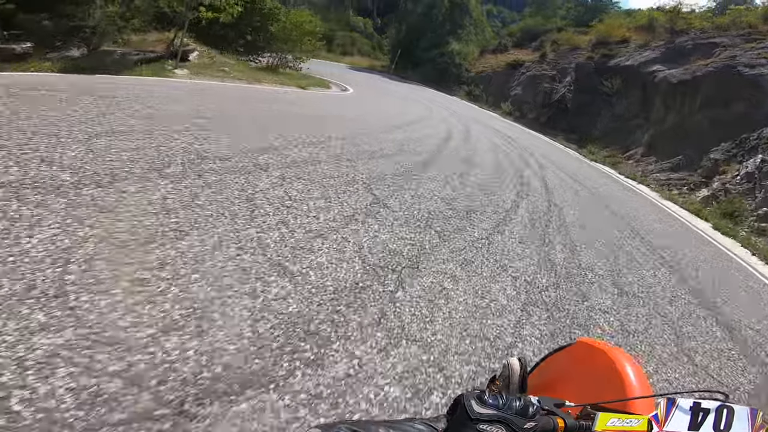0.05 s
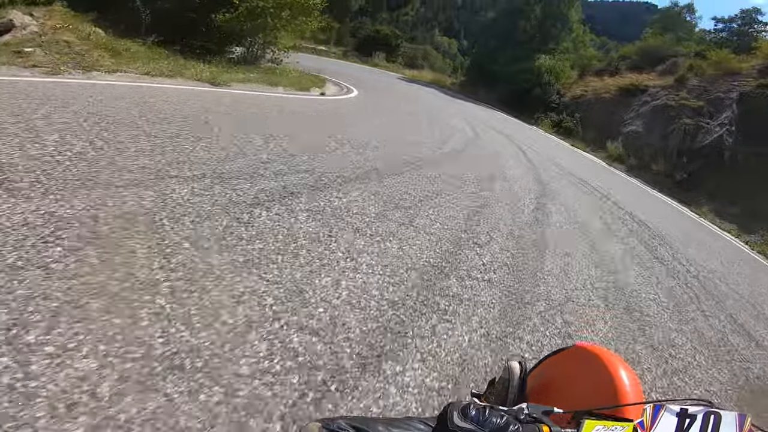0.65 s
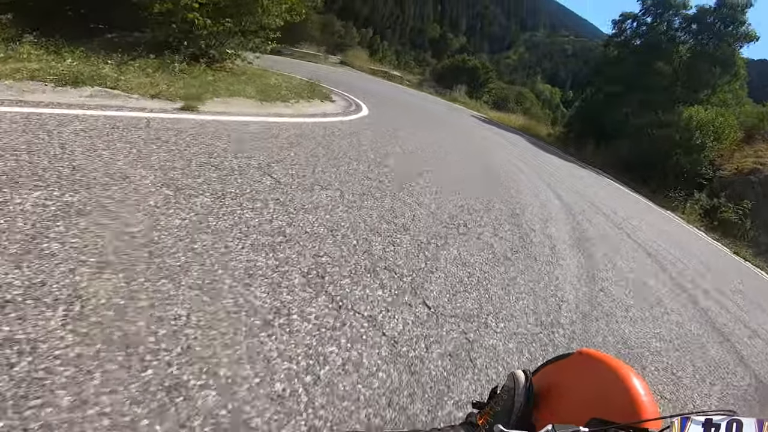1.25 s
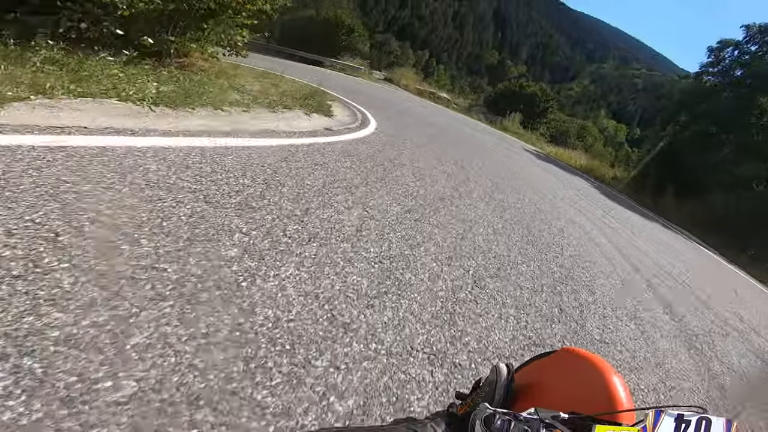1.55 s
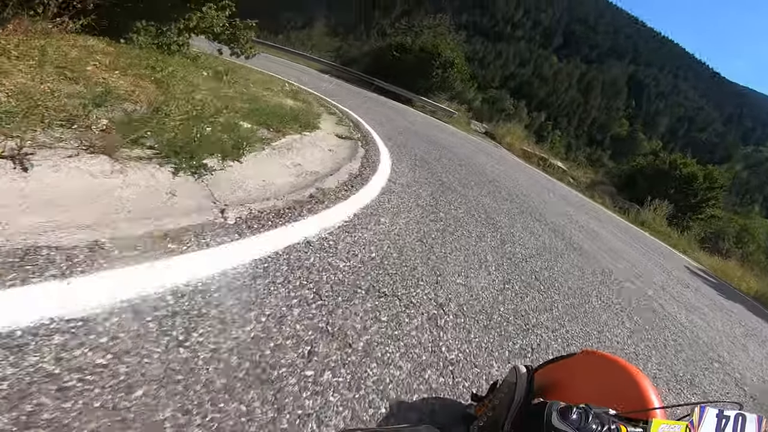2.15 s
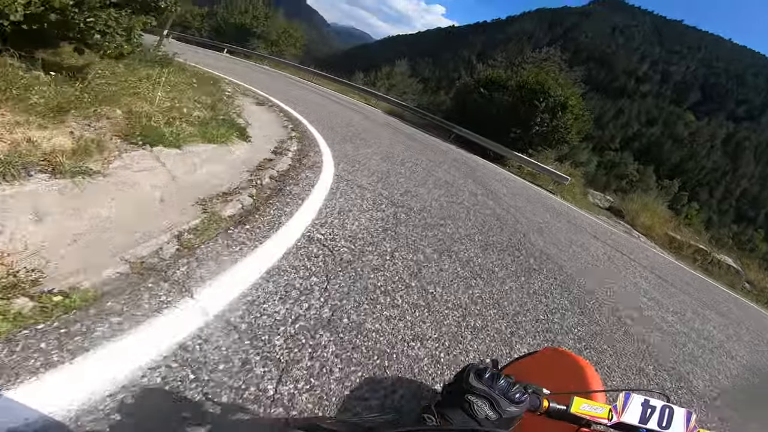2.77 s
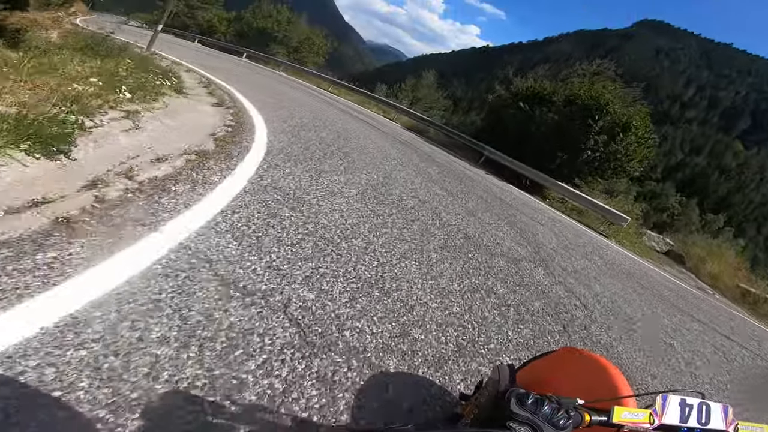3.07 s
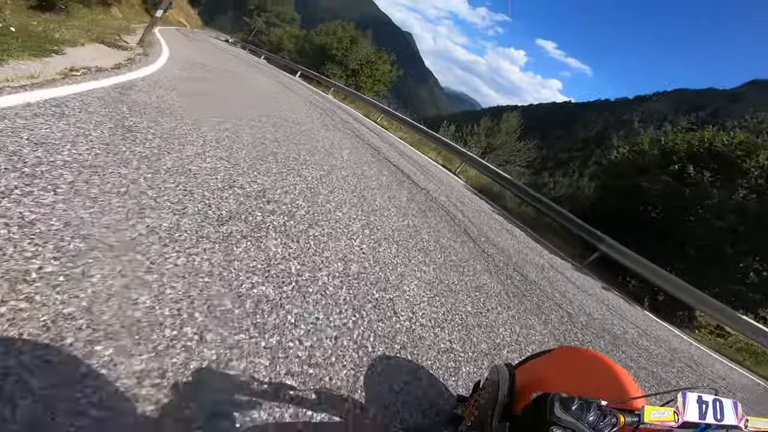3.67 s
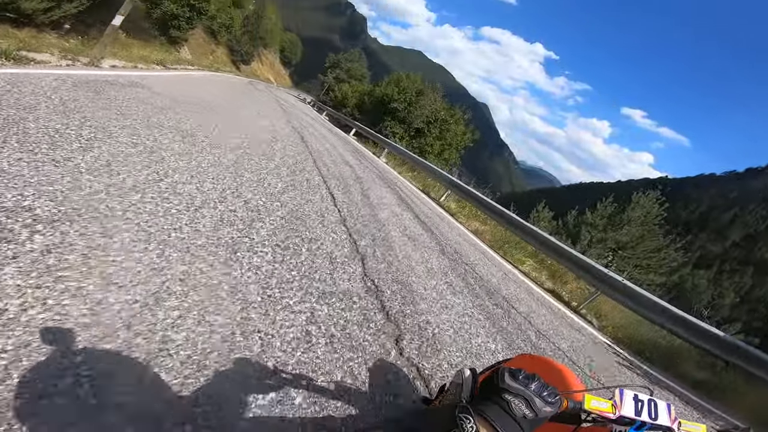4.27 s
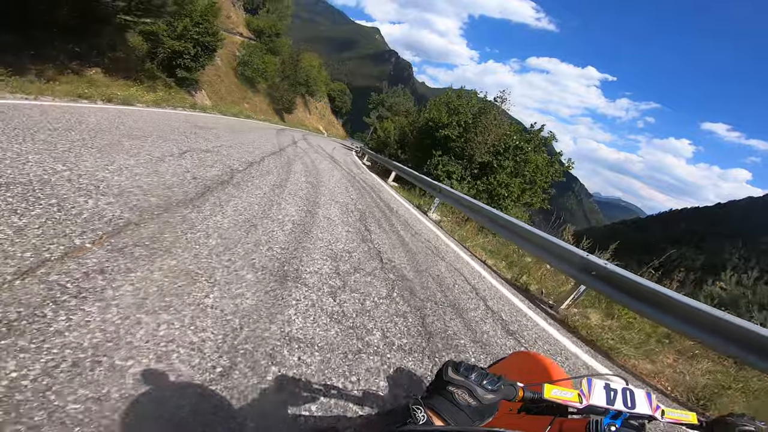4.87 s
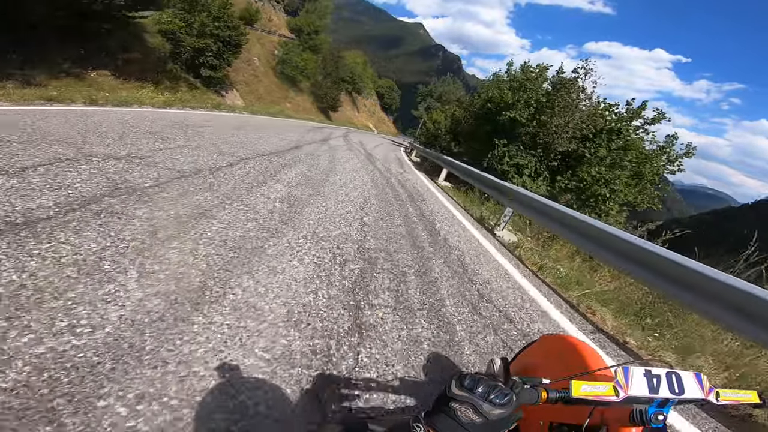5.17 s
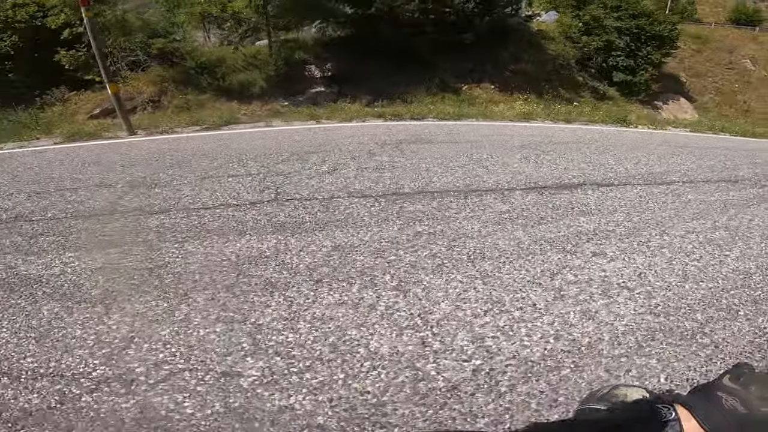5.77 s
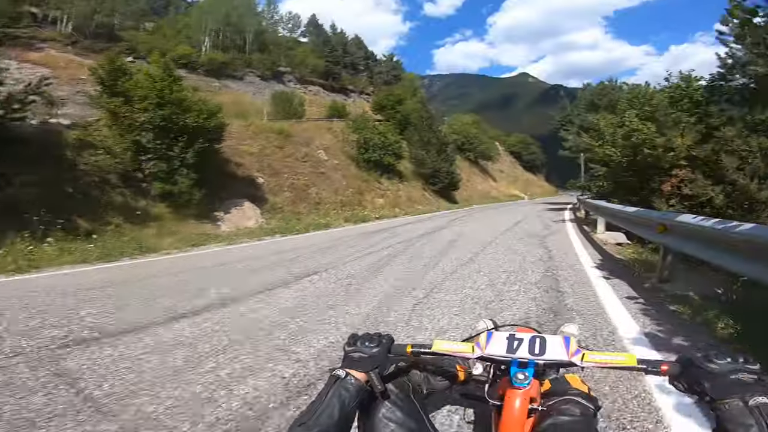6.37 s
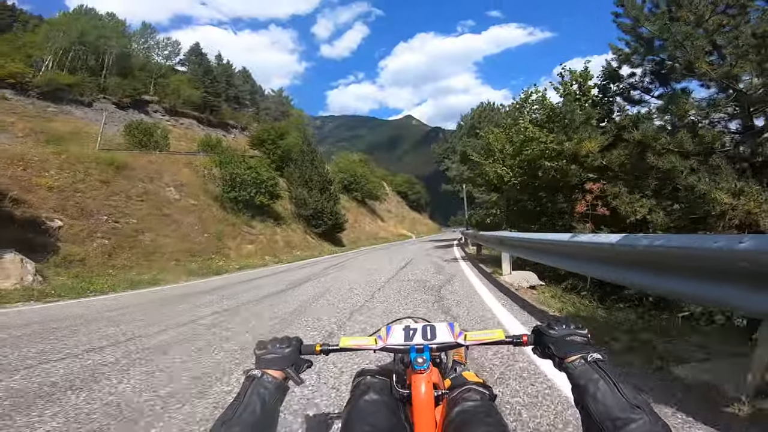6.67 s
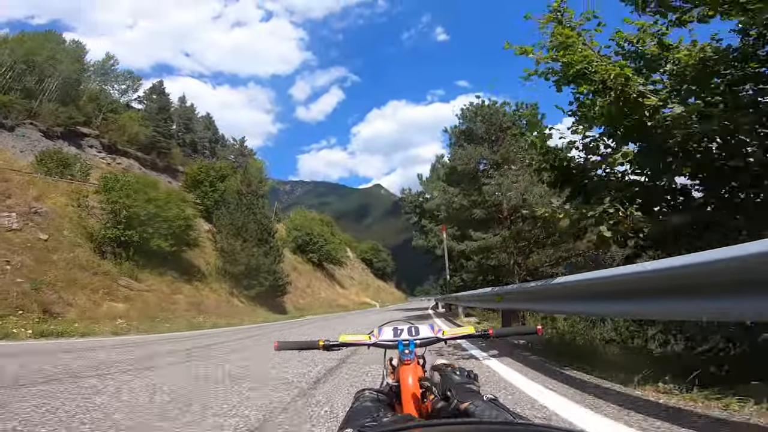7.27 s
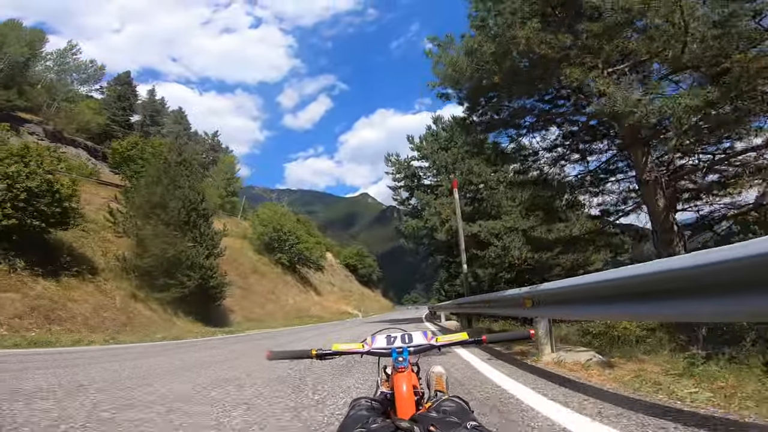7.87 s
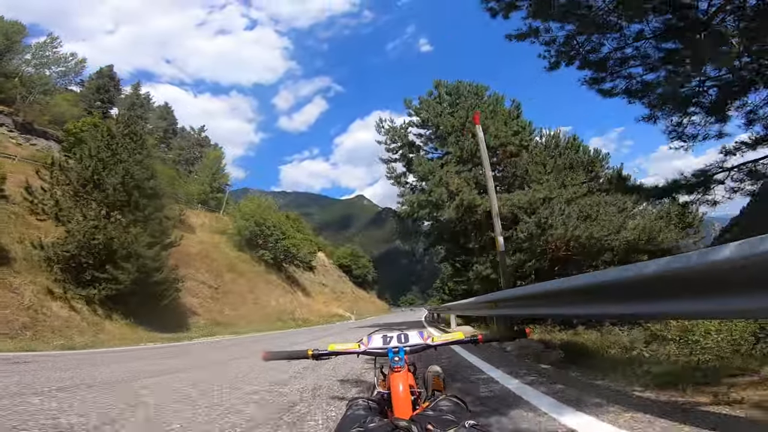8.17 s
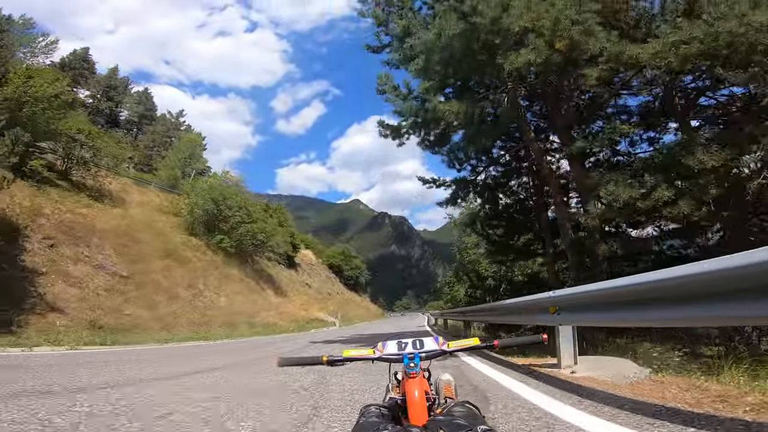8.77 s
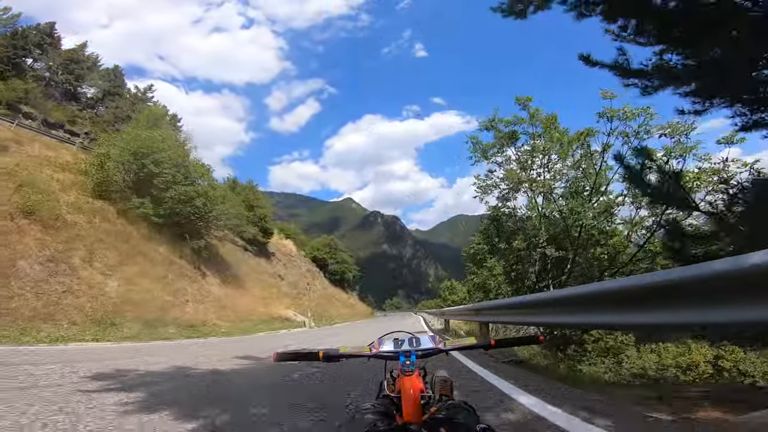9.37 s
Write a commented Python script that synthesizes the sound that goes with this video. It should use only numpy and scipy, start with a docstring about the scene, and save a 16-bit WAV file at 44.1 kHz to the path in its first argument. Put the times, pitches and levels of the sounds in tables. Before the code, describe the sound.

Plastic wheels groan and rasp sideways over coarse asphalt, giving way to rushing wind, short rumbles and a few frame knocks.

```python
"""A hollow drone and a gritty scrub: a drift trike slides through a mountain bend on coarse asphalt.
The road drives the resonances of its hollow plastic wheels, which groan by stick-slip friction and
flick stones against the frame. The trike straightens and gathers speed; the frame knocks as the rider
shifts and shudders over uneven road. Turbulent wind buffets and rushes over the rider's microphone
and sings near the end; a limiter holds the peaks."""
import sys
import numpy as np
from scipy import signal
from scipy.fft import rfft, irfft, next_fast_len
from scipy.io import wavfile
from scipy.ndimage import uniform_filter1d, minimum_filter1d, map_coordinates

SR = 44100
rng = np.random.default_rng(int(sys.argv[2]) if len(sys.argv) > 2 else 0)


def transcribe(u):
    """Save the signal u as a 16-bit wav file named by the first command-line argument.

    u: samples, shape (n,) or (channels, n), limited to [-1, 1]; the rate is SR.
    q: integer samples, one column per channel.
    """
    v = np.clip(np.atleast_2d(u).T, -1, 1)
    q = np.round(v * 32767).astype(np.int16)
    wavfile.write(sys.argv[1], SR, q)


N = 424683
VIBRATION_HOLD = 0.61  # how far a driven vibration is evened out, 0-1

# sideways slip of the rear wheels: t/s, share of sliding, share of hard skid
WHEEL_SLIP = [(0, 0.68, 0.95), (1.15, 0.64, 0.73), (1.55, 0.93, 0.42), (2.4, 0.98, 0.01), (5.2, 0.94, .02),
              (5.56, 0.8, 0.28), (5.65, 0.15, 0.27), (6.48, 0.03, 0.39), (6.75, 0.23, 0.04)]
# spectrum of plastic carving over stone: f/Hz, level/dB
CARVE_SPECTRUM = [(300, -24.5), (700, -3.5), (1000, -0.2), (1250, -3.5), (1450, -2.5), (2100, -3),
                  (2650, -10), (3000, -11.5), (4500, -29), (6500, -33), (12000, -72.5)]


def wheel_drone(road, bite_db, straight):
    """Forced resonance: the road drives the hollow wheels; sliding favours their lower modes."""
    # wall and cavity modes: f/Hz, width/Hz, sliding level/dB, rolling level/dB
    modes = [(143, 45, -20, -22), (193.7, 40, -15.5, -15), (266.9, 31.6, 2, -14.5),
             (299.1, 47.3, -0.2, -4.5), (355, 50, -4.5, -5), (414, 39, -3.6, -8), (448.6, 41, -7.8, -9),
             (492.4, 73, -22, -8), (578, 75, -14, -16), (670, 79, -18.5, -20.5), (789, 44, -18, -31),
             (901, 146, -29.5, -28)]
    # surges and sags as weight shifts on the wheels: centre t/s, duration/s, gain/dB
    loads = [(.42, .2, 2), (1.05, 0.26, -0.5), (1.68, .3, 0), (2.25, .2, 1), (2.68, .16, -4.5),
             (2.93, .16, 2), (3.68, 0.13, -2), (3.88, 0.16, -1), (4.53, 0.15, 1.5), (5.22, 0.16, 0.5),
             (5.52, 0.29, 4), (6.34, .12, -1), (6.84, 0.092, -2)]
    sliding, skid = curves(WHEEL_SLIP)
    rings = np.array([resonance(hz, width) for hz, width, _, _ in modes])
    mode_hz, _, slide_db, roll_db = np.transpose(modes)

    def mix(vibrations):
        roll, slide = (amp(db) @ vibrations / np.std(amp(db) @ rings) for db in (roll_db, slide_db))
        return blend(roll, slide, sliding)

    bite_gain = amp(1.7 * np.outer(mode_hz / 1000, bite_db))  # higher modes answer most to a hard bite
    drone = mix(rings * bite_gain) * steadying(mix(rings), VIBRATION_HOLD)
    level_db = -20.5 + 8 * sliding - 0.34 * skid - 13 * straight
    return amp(level_db + swells(loads) + .35 * road) * drone


def gliding_tones():
    """Narrow-band noise: the wheels groan, and near the end the wind sings higher as speed grows."""
    # gliding bands of tone, the last one wind: start t/s, end t/s, start f/Hz, end f/Hz, width/Hz, level/dB
    bands = [(0, 1.249, 560, 589, 170, -28), (.75, 1.202, 758, 654, 300, -26.5),
             (1.1, 2.2, 460.8, 369.8, 124, -19.5), (1, 1.35, 1595, 1566, 300, -32),
             (.9, 1.8, 2260, 2330, 170, -38.5), (.3, 1.4, 3120, 3030, 240, -42),
             (6.38, 6.76, 3600, 3600, 2200, -46.5), (2.799, 3.901, 600, 580, 130, -29.5),
             (3.5, 4.898, 785, 804, 130, -32), (3, 5.601, 2030, 2160, 380, -41),
             (2.88, 3.15, 640, 620, 170, -31), (5.6, 6.301, 325.6, 345.2, 66, -25),
             (4.4, 5.65, 420, 445, 69, -28), (5.7, 7.02, 428, 423, 43, -23.5),
             (6.85, 7.45, 520, 560, 160, -25.5), (7.5, 9.9, 1430, 1520, 390, -32),
             (8.5, 9.9, 730, 870, 280, -30)]
    track = np.zeros(N)
    for start, end, from_hz, to_hz, width_hz, db in bands:
        progress = np.linspace(0, 1, round((end - start) * SR))
        flutter = filtered(noise(), lambda f: 1 / (1 + (2 * f / width_hz) ** 4))
        baseband = flutter[:len(progress)] + 1j * flutter[-len(progress):]
        phase = 2 * np.pi * np.cumsum(from_hz + (to_hz - from_hz) * progress) / SR
        band = (baseband * np.exp(1j * phase)).real
        envelope = np.abs(np.sin(np.pi * progress)) ** 0.55
        add(track, start, amp(db) * unit(band * steadying(band, VIBRATION_HOLD)) * envelope)
    return track


def scrub(road, bite_db, straight):
    """Sliding friction: plastic tears over the stone tips, louder and brighter in a hard skid."""
    # spectrum of a hard skid: f/Hz, level/dB
    skid_spectrum = [(300, -19.5), (600, 5.5), (1100, -3), (1600, -3), (2300, -1), (3100, -6.5),
                     (4200, -15.5), (5500, -27.5), (8000, -42), (12000, -76.5)]
    sliding, skid = curves(WHEEL_SLIP)
    level_db = -34.5 + 4 * sliding + 7.5 * skid + straight
    contact = lambda: patchy(blend(noise(), impacts(per_s=1800, spread_db=4), 0.56), depth_db=1.24)
    rub = blend(coloured(contact(), CARVE_SPECTRUM), coloured(contact(), skid_spectrum), skid)
    return amp(level_db + bite_db + 1.7 * road * (1 - .5 * skid)) * rub


def wind(straight):
    """Turbulence: eddies buffet the microphone; at speed, vortex shedding throbs and the air rushes."""
    # buffeting, weakest in the slow middle of the bend: t/s, level/dB
    airflow = [(0, -17.5), (.45, -24.5), (1.25, -25.5), (1.7, -35.5), (2.6, -41), (3, -35.5), (4.55, -31),
               (6.3, -24.5), (7.05, -15), (9.63, -15.5)]
    # gusts and lulls: centre t/s, duration/s, gain/dB
    gusts = [(.29, 0.17, 5.5), (2.04, 0.26, 11.5), (3.72, .2, 5), (4.28, .2, 4), (4.88, 0.83, 6.5),
             (5.45, .3, 5), (5.64, 0.21, -8), (6.1, .14, 5), (6.52, 0.29, 5.5), (6.8, 0.32, -3)]
    # spectra of the eddies and of the airstream: f/Hz, level/dB
    eddy_spectrum = [(10, -14.5), (25, -5.5), (55, 0), (90, -2.5), (125, -3.5), (165, -10), (250, -15),
                     (400, -25.5), (800, -38.5), (2000, -86)]
    rush_spectrum = [(120, -12), (200, -6), (265, 8.5), (335, 7), (440, -12.5), (530, 8), (730, 5),
                     (840, 3), (1150, -1.5), (1370, 2.5), (1720, 2), (1950, -1.5), (2450, -8),
                     (2800, -14.5), (3300, -14), (4100, -22), (6000, -34), (6600, -26.5), (7500, -50.5),
                     (12000, -86)]
    airflow_db, = curves(airflow)
    gust_db = swells(gusts)
    eddies = unit(filtered(coloured(noise(), eddy_spectrum), lambda hz: 1 / (1 + (hz / 2000) ** 4)))
    throb = unit(resonance(centre_hz=97, width_hz=88))
    eddies = blend(eddies, throb, .35 * straight ** 2)
    eddies = unit(eddies * steadying(eddies, hold=.3))
    buffet = amp(airflow_db + gust_db + wobble(14)) * eddies
    rush_db = -24.5 + speed_gain_db(db_per_s=1.7) + 0.6 * gust_db
    flutter = unit(amp(1.7 * eddies + 1.5 * wobble(170) + 0.41 * wobble(25)))
    rush = coloured(patchy(noise(), depth_db=1.03), rush_spectrum)
    return buffet + straight * amp(rush_db) * flutter * rush


def knocks():
    """Damped free vibration: the frame thumps and rebounds as the rider shifts."""
    # blows to the frame: t/s, level/dB
    blows = [(6.734, -3), (6.76, -9.5), (6.79, -7.5), (6.811, -11.5), (8.626, -7.5)]
    # frame modes: f/Hz, relative level/dB, T60/s
    modes = [(69, -3, 0.13), (121, -5, 0.09), (213, -1, 0.07), (385, -4.5, 0.055), (548, -2.5, 0.045),
             (917, -7.5, 0.024)]
    track, t = np.zeros(N), np.arange(SR // 4) / SR
    for s, db in blows:
        thump = np.zeros(len(t))
        for hz, mode_db, t60 in modes:
            decay = amp(mode_db + rng.normal(0, 1.7) - 60 * t / t60)
            thump += decay * np.sin(2 * np.pi * (hz * t + rng.random()))
        add(track, s, amp(db) * thump * attack(t, rise_s=0.0013))
    return track


def shudders():
    """Forced vibration: uneven road shakes the frame into short rumbles."""
    # shakes: centre t/s, duration/s, level/dB
    shakes = [(6.55, 0.15, -17), (6.757, 0.095, -17), (7.065, .18, -16.5), (7.678, 0.17, -19.5),
              (7.78, 0.1, -18.5), (8.093, .12, -18.5), (8.288, .2, -18.5), (8.637, .09, -19),
              (9.353, 0.11, -17.5)]
    # spectrum of the shaken frame: f/Hz, level/dB
    spectrum = [(50, -6), (130, 1), (220, 1), (330, -1), (450, -10), (700, -11.5), (1050, -18.5),
                (1500, -41), (4000, -77.5)]
    envelope = swells([(s, length, amp(db)) for s, length, db in shakes])
    rumble = coloured(noise(), spectrum)
    return envelope * unit(rumble * steadying(rumble, VIBRATION_HOLD))


def bumps():
    """Impact noise: the plastic wheels slap over coarse spots in the asphalt."""
    # slaps: t/s, level/dB
    slaps = [(1.039, -23), (2.812, -25), (3.283, -22), (3.823, -26), (4.551, -23), (4.58, -27),
             (6.054, -20), (8.674, -14), (8.854, -17)]
    track, t = np.zeros(N), np.arange(SR // 10) / SR
    t60 = 0.019
    for s, db in slaps:
        add(track, s, amp(db - 60 * t / t60) * attack(t, rise_s=0.00092))
    return track * coloured(noise(), CARVE_SPECTRUM)


def stones():
    """Impact transients: each stone cracks brightly, then rattles as it breaks or skips away."""
    # stones crunched and flicked against the frame: t/s, level/dB, rise/s, rattle T60/s
    hits = [(.586, -35.5, .0007, .03), (3.385, -34, .002, .05), (3.617, -36, 0.0011, .04),
            (4.579, -34, .001, .05), (4.61, -29, .01, 0.23), (4.925, -37, 0.0069, .12),
            (5.692, -31, .0005, 0.035), (5.946, -40, 0.00056, .03), (6.054, -23, 0.00069, 0.13),
            (6.374, -32.5, .001, .05), (7.583, -32, 0.0006, 0.037), (7.947, -35, 0.00091, 0.045),
            (8.71, -30.5, 0.001, 0.054), (8.855, -28.5, 0.00075, .04)]
    # spectra of the first crack and of stone clacking on metal: f/Hz, level/dB
    crack_spectrum = [(1500, -10), (4500, 1), (6200, 8.5), (7500, -1), (9800, -6), (11000, -17.5),
                      (12000, -29), (15000, -27)]
    clack_spectrum = [(500, -14.5), (1500, 6.5), (3000, 9), (4600, 0), (5400, 2), (6300, 4), (7300, -7.5),
                      (8600, -12), (9500, -13), (10400, -21), (12000, -38), (15000, -41)]
    crack_db, crack_t60, rattle_db = -2.5, 0.011, -6
    cracks, rattles, t = np.zeros(N), np.zeros(N), np.arange(SR // 3) / SR
    for s, db, rise_s, t60 in hits:
        onset = amp(db) * attack(t, rise_s)
        add(cracks, s, onset * amp(crack_db - 60 * t / crack_t60))
        add(rattles, s, onset * amp(rattle_db - 60 * t / t60))
    cracks *= coloured(noise(), crack_spectrum)
    rattles *= amp(2 * wobble(300)) * coloured(noise(), clack_spectrum)
    return cracks + rattles


def grit(road, bite_db, straight):
    """Shot noise: loose grains crackle in clumps where the road is rough."""
    # spectrum of the grains: f/Hz, level/dB
    spectrum = [(1000, -24.5), (2200, 1.5), (4000, 8.5), (5500, 1), (6300, -5.5), (7200, -7), (8600, -10),
                (9300, -18), (10200, -18), (11500, -32), (15000, -51.5)]
    sliding, skid = curves(WHEEL_SLIP)
    level_db = -50 + 0.3 * sliding + 6 * skid - 6 * straight + speed_gain_db(db_per_s=1.5)
    clumps_db = (1.66 + 0.8 * (sliding - skid)) * road
    grains = patchy(blend(noise(), impacts(per_s=730, spread_db=3), 0.5), depth_db=1.5)
    return amp(level_db + 1.1 * bite_db + clumps_db) * coloured(grains, spectrum)


def dust_sizzle(road, bite_db):
    """Micro-impacts: the finest dust sizzles under the wheels, most at the end of the slide."""
    # course of the sizzle: t/s, level/dB
    levels = [(2.4, -95), (2.9, -80), (3.3, -85), (4.4, -79), (5.5, -77), (5.65, -98)]
    # spectrum of the dust: f/Hz, level/dB
    spectrum = [(7000, -25), (10500, -2.5), (12000, -1), (15500, -7)]
    level_db, = curves(levels)
    dust = blend(noise(), impacts(per_s=400, spread_db=5.5), .7)
    return amp(level_db + bite_db + 2.5 * road) * coloured(dust, spectrum)


def wheel_bite():
    """Friction varies with contact: a gain in dB that follows grip and jumps on rough asphalt."""
    # the wheels bite harder or go light: centre t/s, duration/s, gain/dB
    bites = [(.05, 0.4, 2), (2.64, 0.19, -1.5), (2.98, 0.52, 1.3), (4.29, 0.23, 0.3), (4.745, .1, -3),
             (5.02, 0.19, -1.5), (5.5, 0.41, -1.9), (5.95, 0.53, -1.6), (6.49, 0.16, 2), (6.8, 0.23, -3),
             (7.25, .5, 2.5)]
    # scrapes across rough patches: start t/s, duration/s, gain/dB
    patches = [(1.079, 0.027, 2), (1.132, 0.044, 2.5), (1.383, .03, 1.5), (1.656, .04, 1.5),
               (2.243, 0.056, 1.5), (2.355, .03, 3.5), (2.93, 0.051, -0.5), (3.05, 0.022, 4),
               (3.392, .042, 1), (3.608, 0.023, 5.5), (4.001, 0.032, 3), (4.247, .027, 4.5),
               (4.291, 0.031, 4.5), (4.342, 0.033, 2.5), (4.44, 0.06, 2), (4.541, 0.061, 3.5),
               (4.61, 0.11, 3), (4.925, 0.043, 3.5), (5.087, 0.045, 2)]
    edge_s, corners = 0.0088, []
    for s, length, db in patches:
        corners += [(s, 0), (s + edge_s, db), (s + length - edge_s, db), (s + length, 0)]
    return swells(bites) + curves(sorted(corners))[0]


def resonance(centre_hz, width_hz):
    """Noise rings through two equal resonators in series, drifting in pitch and strength."""
    peak = lambda f: 1j * f * width_hz / (centre_hz ** 2 - f * f + 1j * f * width_hz)
    clock = np.cumsum(1 + .007 * wobble(3))  # changing load bends the pitch
    ring = filtered(noise(), lambda f: peak(f) ** 2)
    return map_coordinates(ring, [clock], order=1, mode="mirror") * amp(0.49 * wobble(5))


def steadying(x, hold):
    """Self-limiting gain: a driven vibration is fed when weak and checked when strong."""
    power = np.abs(uniform_filter1d(unit(x) ** 2, size=2600)) + .01
    return power ** (-hold / 2)


def speed_gain_db(db_per_s):
    """Level growth once the trike gathers speed, from 6.4 s on."""
    return db_per_s * np.maximum(0, np.arange(N) / SR - 6.4)


def impacts(per_s, spread_db):
    """Poisson train of tiny blows of uneven size, at rms 1."""
    blows = (rng.random(N) < per_s / SR) * rng.choice([-1, 1], N)
    return unit(blows * amp(spread_db * np.clip(noise(), -2, 2)))


def patchy(x, depth_db):
    """Spectral modulation: colour drifts in patches a few hundred Hz wide."""
    spectra = signal.stft(x, nperseg=1024)[2]
    field = uniform_filter1d(rng.standard_normal(spectra.shape), size=5, axis=0)
    field = uniform_filter1d(field, size=12, axis=1)
    return unit(signal.istft(spectra * amp(depth_db * unit(field)), nperseg=1024)[1][:N])


def coloured(x, spectrum):
    """x shaped by points of f/Hz, level/dB, at rms 1."""
    f, db = np.transpose(spectrum)
    return unit(filtered(x, lambda hz: amp(np.interp(np.log(hz + 1), np.log(f), db))))


def filtered(x, response):
    """x passed through a frequency response."""
    size = next_fast_len(N + SR // 2)
    return irfft(rfft(x, size) * response(np.fft.rfftfreq(size, 1 / SR)), size)[:N]


def swells(rows):
    """Sum of raised-cosine pulses, each with its centre, duration and height."""
    t = np.arange(N) / SR
    return sum(top * np.cos(np.pi * np.clip((t - s) / span, -.5, .5)) ** 2 for s, span, top in rows)


def curves(rows):
    """Linear interpolation of each column after the time, one value a sample."""
    s, *columns = np.transpose(rows)
    return [np.interp(np.arange(N) / SR, s, column) for column in columns]


def wobble(per_s):
    """A smooth random curve with per_s knots a second."""
    return map_coordinates(rng.standard_normal(int(N * per_s / SR) + 4), [np.arange(N) * per_s / SR])


def attack(t, rise_s):
    """Gaussian onset from 0 to 1."""
    return 1 - np.exp(-(t / rise_s) ** 2)


def blend(a, b, share):
    """Equal-power mix with the given share of b."""
    share = np.clip(share, 0, 1)
    return np.sqrt(1 - share) * a + np.sqrt(share) * b


def add(track, s, sound):
    """Superpose a sound on the track at time s."""
    part = track[round(s * SR):][:len(sound)]
    part += sound[:len(part)]


def noise():
    """White noise."""
    return rng.standard_normal(N)


def amp(db):
    """Decibels to gain."""
    return 10 ** (np.asarray(db) / 20)


def unit(x):
    """Scale to rms 1."""
    return x / np.sqrt(np.mean(x ** 2) + 1e-20)


def scene():
    """Common excitation: one road modulates drone, scrub, grit and dust; wind rises after the bend."""
    # the trike leaves the bend and faces the wind: t/s, share of straight running
    bend_exit = [(6.3, 0.3), (6.6, 0.52), (7.15, 0.76)]
    straight, = curves(bend_exit)
    road = unit(.65 * wobble(20) + 1.5 * wobble(55) + 1.7 * wobble(160))  # coarse to fine unevenness
    bite_db = wheel_bite()
    tones = wheel_drone(road, bite_db, straight) + gliding_tones()
    rasp = scrub(road, bite_db, straight) + grit(road, bite_db, straight) + dust_sizzle(road, bite_db)
    return (tones + rasp + bumps() + stones() + knocks() + shudders() + wind(straight))[None]


def record(dry):
    """Peak limiting: a fast gain dip holds the peaks, then a steep low-pass ends the band."""
    ceiling_db, cutoff_hz = -3.8, 15700
    needed_gain = np.minimum(1, amp(ceiling_db) / (np.abs(dry[0]) + 1e-9))
    gain = uniform_filter1d(minimum_filter1d(needed_gain, size=400), size=300)
    low_pass = signal.ellip(10, .1, 90, cutoff_hz, fs=SR, output="sos")
    return signal.sosfilt(low_pass, dry[0] * gain)[None]


dry = scene()
out = record(dry)
transcribe(out)
```